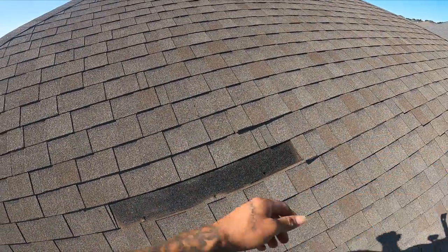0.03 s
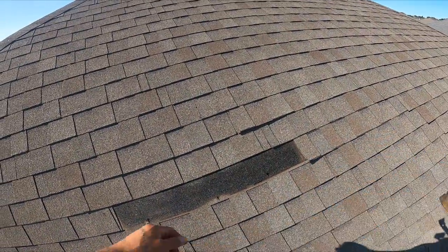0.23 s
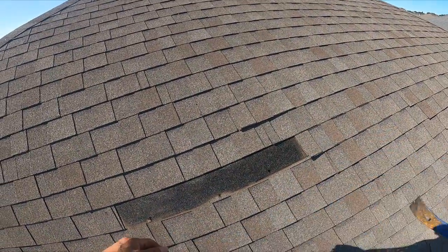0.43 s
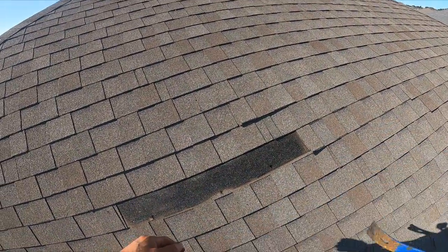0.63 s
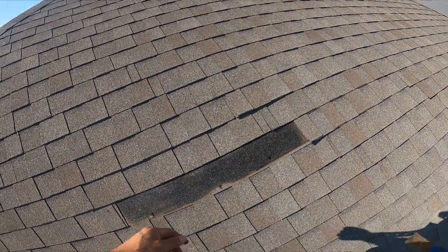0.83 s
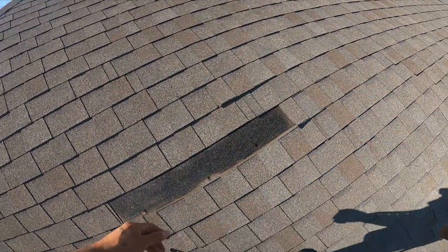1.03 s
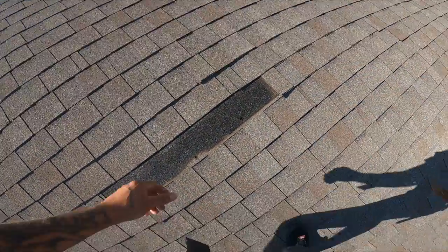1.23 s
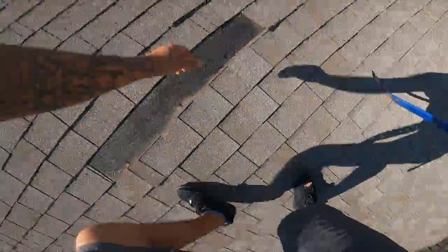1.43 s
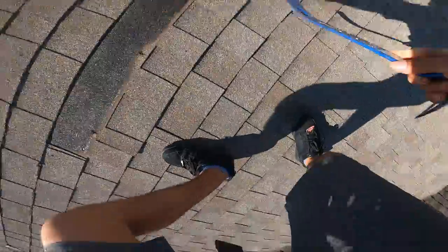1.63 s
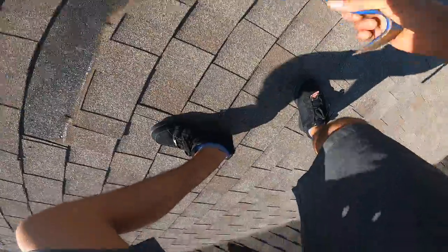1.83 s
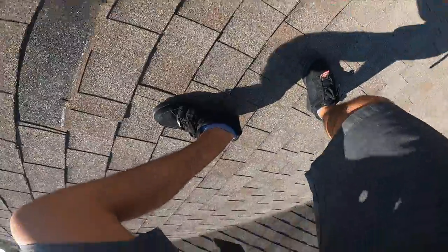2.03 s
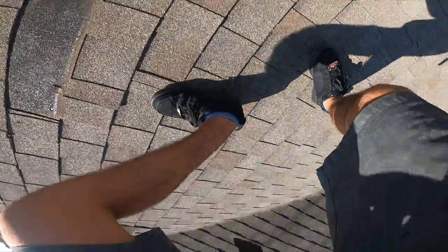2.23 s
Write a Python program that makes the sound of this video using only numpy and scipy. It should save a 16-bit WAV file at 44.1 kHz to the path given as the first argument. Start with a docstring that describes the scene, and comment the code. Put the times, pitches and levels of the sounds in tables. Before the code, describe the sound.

Gritty shoe scrapes on roof shingles, heard close up outdoors. After a few knocks and a brief steel clink, soles shift, snap loose grains and tap down, while light wind buffets the microphone and clothes rub faintly.

```python
"""Pry bar on a shingle roof

Someone shifts position on asphalt shingles, steel pry bar in hand. The bar clinks, hands and
shoes knock on the wooden deck, soles scrape over the mineral grit and loose grains snap.
Light wind buffets the two ports of a body-worn microphone and clothes rub against it."""
import sys
import numpy as np
from scipy import signal
from scipy.fft import rfft, irfft, next_fast_len
from scipy.io import wavfile

SR = 44100
rng = np.random.default_rng(int(sys.argv[2]) if len(sys.argv) > 2 else 0)


def unload_wav(signal):
    """Save mono or channel-first audio to the path in sys.argv[1] as 16-bit WAV at rate SR, clipped to [-1, 1]."""
    wavfile.write(
        sys.argv[1],
        SR,
        np.round(np.clip(np.atleast_2d(signal).T, -1, 1) * 32767).astype(np.int16),
    )


N = 101429


def undb(db):
    return 10 ** (np.asarray(db) / 20)


def unit(x):
    """Scale to rms 1."""
    return x / np.sqrt(np.mean(x ** 2))


def curve(table, column=1):
    """A column of a timed table, joined by straight lines."""
    table = np.array(table)
    return np.interp(np.arange(N) / SR, table[:, 0], table[:, column])


def colour(x, points, tilt_db=0):
    """EQ through (f/Hz, level/dB) points, tilted per octave above the third point; rms 1."""
    hz, db = np.array(points).T
    size = next_fast_len(x.shape[-1], True)
    octave = np.log2(np.maximum(np.fft.rfftfreq(size, 1 / SR), 1))
    gain = np.interp(octave, np.log2(hz), db) + tilt_db * np.maximum(octave, np.log2(hz[2]))
    return unit(irfft(rfft(x, size) * undb(gain), size)[..., :x.shape[-1]])


def band(x, lo_hz, hi_hz, order):
    """Causal band-pass."""
    return signal.sosfilt(signal.butter(order, [lo_hz, hi_hz], "band", fs=SR, output="sos"), x)


def add(out, start, x, pan_db=0):
    """Mix a sound in at a time; pan is left minus right."""
    i = max(int(start * SR), 0)
    x = (x * undb(np.array([[pan_db], [-pan_db]]) / 2))[:, :N - i]
    out[:, i:i + x.shape[1]] += x


def spread(mid, side, side_db=-2):
    """Stereo from a common mid and a weaker opposed side."""
    return mid + undb(side_db) * side * np.array([[1], [-1]])


# Fader ride of the clothes: t/s, rms level/dB
CLOTH_RIDE = [(0, -48.5), (.42, -50.5), (1.1, -57.5), (1.75, -58.5), (1.83, -44), (1.92, -56.5),
              (2.13, -56), (2.19, -48), (2.3, -56.5)]
# Muffled cloth EQ: f/Hz, level/dB
CLOTH_EQ = [(70, -10.5), (150, -2), (260, 0), (420, -12.5), (8000, -62)]


def clothes_and_air():
    """Clothes rub softly on the microphone over a bed of quiet outdoor air."""
    cloth = colour(rng.standard_normal(N), CLOTH_EQ) * undb(curve(CLOTH_RIDE))
    air_eq = [(500, -3), (1700, -10), (3000, -19), (10000, -31), (15000, -68)]
    air = spread(*colour(rng.standard_normal((2, N)), air_eq))
    return cloth + undb(-63.5) * air


# Fader ride of the rumble: t/s, left level/dB, right level/dB
WIND_RIDE = [(0, -39.5, -43), (.26, -44.5, -44.5), (.35, -27.5, -37), (.56, -27.5, -35), (.9, -31.5, -37),
             (1.07, -40, -38.5), (1.23, -37, -27.5), (1.55, -36.5, -44.5), (2.0, -41.5, -34.5),
             (2.15, -48, -48)]
# Rumble EQ: f/Hz, level/dB
RUMBLE_EQ = [(12, -11.5), (28, 5.5), (80, -2), (170, -17.5), (2000, -123.5)]
# Wind thumps on the ports: t/s, f/Hz, width/s, left level/dB, right level/dB
BUFFETS = [(.4035, 91, 0.0035, -15, -21), (0.5225, 143, 0.0025, -25, -33.5),
           (0.562, 101, 0.0048, -21, -32.5), (0.7805, 76.4, 0.012, -16.5, -36),
           (1.383, 113, 0.003, -27, -44), (1.94, 38, 0.014, -36, -32)]


def wind():
    """Each port rumbles on its own; single turbulent eddies swing the pressure once or twice."""
    t = np.arange(N) / SR
    ride = undb([curve(WIND_RIDE, column=1), curve(WIND_RIDE, column=2)])
    out = colour(rng.standard_normal((2, N)), RUMBLE_EQ) * ride
    eddy_eq = [(40, 3), (110, 19.5), (190, 8), (330, -6), (3000, -59)]
    turbulence = undb(-7) * colour(rng.standard_normal((2, N)), eddy_eq)
    for at, hz, width, left_db, right_db in BUFFETS:
        swell = 1 / np.cosh(np.clip((t - at) / width, -20, 20)) ** 2
        swing = np.sqrt(2) * np.sin(2 * np.pi * hz * (t - at))
        out += undb([[left_db], [right_db]]) * swell * (swing + turbulence)
    return out


# Where the weight rests: t/s, pan/dB
SHOE_PAN = [(1.25, 1), (1.6, -2), (1.87, -1), (2.05, 2.5)]


def shoe_pan(at):
    """Left-right balance of the shoes at a time."""
    return np.interp(at, *np.array(SHOE_PAN).T)


def granules(pitches_hz=(700, 2000, 4500, 10000), grains_per_s=3000, spread_db=6.5, decay_cycles=1.67):
    """Grit texture: dense tiny bursts of uneven size, coarse to fine, narrower in stereo at the low end."""
    mid = side = 0
    for hz in pitches_hz:
        hits = rng.random(N) < grains_per_s / SR
        sizes = undb(spread_db * np.minimum(rng.exponential(size=N), 4.5))
        decay = np.exp(-2 * hz / (decay_cycles * SR))
        bursts = np.sqrt(signal.lfilter([1 - decay], [1, -decay], (hits * sizes) ** 2))
        common, opposed = band(bursts * rng.standard_normal((2, N)), hz * 0.38, hz * 2.0, order=1)
        mid += common
        side += opposed * np.sqrt(hz / pitches_hz[-1])
    return spread(mid, side)


# Scrape cues: crest t/s, rise/s, fall/s, rms level at the crest/dB, treble tilt/(dB per octave)
SCRAPES = [(0.247, 0.011, 0.041, -49, -8), (.95, 0.067, 0.16, -60.5, -5),
           (1.115, 0.006, 0.056, -57.5, -3.5), (1.188, 0.016, 0.025, -52.5, -0.5),
           (1.29, 0.05, 0.07, -54, -1.5), (1.518, 0.097, 0.17, -57.5, -1), (1.584, 0.0045, 0.019, -37, 4),
           (1.624, 0.0027, 0.021, -45, 3.5), (1.673, 0.015, 0.074, -49.5, 0.5),
           (1.77, 0.0057, 0.0065, -48, 3.5), (1.828, 0.024, 0.023, -36, 2.5), (1.98, 0.11, 0.29, -55, 0),
           (2.111, 0.026, 0.018, -48, -1.5), (2.19, 0.015, 0.057, -67.5, 0)]
# EQ of rubbed grit: f/Hz, level/dB
SCRAPE_EQ = [(100, 7), (480, 8.5), (950, 1.5), (1400, 6.5), (2200, 2.5), (4300, 0), (6800, -6),
             (13500, -19.5), (16000, -42)]


def scrapes():
    """Soles and hands drag over the granules, swelling and dying away."""
    out, t, grit = np.zeros((2, N)), np.arange(N) / SR, granules()
    for crest, rise, fall, db, tilt_db in SCRAPES:
        pressure = np.exp(-(np.minimum(t - crest, 0) / rise) ** 2 / 2 - np.maximum(t - crest, 0) / fall)
        patch = colour(np.roll(grit, rng.integers(N), axis=1), SCRAPE_EQ, tilt_db)
        add(out, 0, undb(db) * pressure * patch, shoe_pan(crest))
    return out


# Modes of the hollow sole: f/Hz, level/dB, t60/s
SOLE_MODES = [(338, 5, 0.018), (1030, 0, 0.015), (1660, -2.5, 0.014), (2570, -1.5, 0.011),
              (3800, -2, 0.008)]
GRIT_TAIL_S = 0.0028


def shoe_tap(start=2.0333):
    """A sole taps down, crunches on the grit and rings hollow for a few milliseconds."""
    out, t = np.zeros((2, N)), np.arange(SR // 10) / SR
    ring = sum(undb(db) * np.sin(2 * np.pi * hz * t) * np.exp(-np.log(1000) * t / t60)
               for hz, db, t60 in SOLE_MODES)
    crunch = undb(-6.5) * colour(rng.standard_normal(len(t)), SCRAPE_EQ) * np.exp(-t / GRIT_TAIL_S)
    add(out, start, undb(-27.5) * (ring + crunch), shoe_pan(start))
    return out


# Snapping grains: t/s, peak level/dB, f/Hz
SNAPS = [(0.2671, -47, 5000), (0.5982, -44, 5200), (.9984, -40, 4300), (1.0943, -40, 4050),
         (1.1046, -39.5, 3300), (1.1226, -39, 3160), (1.2044, -37, 4400), (1.256, -33.5, 3800),
         (1.2833, -40, 5470), (1.5044, -34.5, 2830), (1.5813, -21.5, 4100), (1.5895, -18, 4750),
         (1.5964, -20, 5930), (1.6277, -11, 4510), (1.6427, -14.5, 4820), (1.6848, -22.5, 5290),
         (1.7946, -35.5, 3370), (1.813, -30.5, 5510), (1.8926, -29.5, 3470), (1.935, -28.5, 3000),
         (1.9726, -29, 4060), (2.0117, -29.5, 4020), (2.09, -34.5, 3600), (2.137, -38.5, 4100),
         (2.175, -37, 3500)]
# Bright EQ of cracking grit: f/Hz, level/dB
CRACK_EQ = [(1000, 5), (2700, 3), (4600, 7), (7000, 1), (12500, -10), (16000, -22)]
ATTACK_S = 0.00021


def grit_snaps(ring_s=0.00068, crack_s=0.00035):
    """A grain gives way: a few cycles of ring in two modes, a broad crack and a short scattered tail."""
    out, t = np.zeros((2, N)), np.arange(SR // 20) / SR
    for start, db, hz in SNAPS:
        mid, side, _ = colour(rng.standard_normal((3, len(t))), CRACK_EQ)
        phase = 2 * np.pi * hz * t
        modes = np.sin(phase) + undb(-13.5) * np.sin(1.857 * phase)
        # Weaker snaps ring shorter and crumble more into their tail.
        ring = modes * np.exp(-t / (ring_s * undb(db) ** 0.15))
        tail = undb(-28.5 - 0.22 * db) * np.exp(-t / GRIT_TAIL_S)
        crack = undb(-12) * np.exp(-t / crack_s)
        attack = 1 - np.exp(-(t / ATTACK_S) ** 2)
        snap = (ring + spread(mid, side) * (crack + tail)) * attack
        add(out, start, undb(db) * snap / abs(snap.mean(0)).max(), shoe_pan(start))
    return out


# Hand and shoe hits: t/s, peak level/dB, low cut f/Hz, high cut f/Hz, ring length factor
KNOCKS = [(0.2352, -22, 205, 287, 0.52), (0.2349, -38, 680, 1770, 1.2), (0.7484, -20.5, 483, 1590, 0.26),
          (0.7593, -33, 557, 720, 6.5), (.7705, -30.5, 530, 720, 3.53), (0.938, -35, 282, 720, 0.74),
          (0.958, -30.5, 253, 1200, 0.92), (0.984, -40, 390, 960, 1.46), (1.328, -39, 350, 2460, 0.21),
          (1.577, -23, 420, 1230, 3.4), (1.5884, -26.5, 385, 1190, 1.6), (1.5961, -23, 119, 564, 0.59),
          (1.603, -29.5, 380, 800, 0.33)]
# Modes of the wooden sheathing under the shingles: f/Hz, level/dB
DECK_MODES = [(135, 12), (260, 9), (330, 0), (432, 4), (588, 6), (640, 8), (890, 0.5), (1020, 6.5),
              (1338, 8.5), (1530, 12.5), (2620, 8.5)]


def deck_knocks(base_t60_s=0.056, lag_s=0.0006):
    """Each blow rings the damped deck, lows arriving last; the contact sets which modes speak."""
    out, t = np.zeros((2, N)), np.arange(SR // 5) / SR
    for start, db, lo_hz, hi_hz, length in KNOCKS:
        ring = 0
        for k, (hz, mode_db) in enumerate(DECK_MODES):
            ratio = hz / 500  # decay and lag scale from 500 Hz
            t60 = base_t60_s * length / ratio ** 0.94
            age = np.maximum(t - lag_s / np.sqrt(ratio), 0)
            contact = ((1 + (lo_hz / hz) ** 6) * (1 + (hz / hi_hz) ** 6)) ** -.5
            detune = 1 + 0.043 * rng.standard_normal()
            tone = (-1) ** k * np.sin(2 * np.pi * hz * detune * age)
            rattle = unit(band(rng.standard_normal(len(t)), hz * 0.63, hz * 1.384, order=2))
            envelope = (1 - np.exp(-(2 * hz * age) ** 2)) * np.exp(-np.log(1000) * age / t60)
            ring += undb(mode_db) * contact * (tone + undb(-7.5) * rattle) * envelope
        add(out, start - lag_s, undb(db) * ring / abs(ring).max())
    return out


# Clink cues: t/s, level/dB, brightness/(dB per octave), ring length factor, edgewise trim/dB, pan/dB
CLINKS = [(.001, -44, -1, 0.84, -2, 6.5), (0.7482, -26.5, -1, 0.87, -33, -5.5),
          (.7512, -46.5, 4.5, 0.84, -35.5, -6)]
# Modes of the steel bar: f/Hz, level/dB, t60/s, edgewise flag (rounded to 0 or 1)
BAR_MODES = [(1320, 5.5, 0.011, 0), (1794, -5, 0.16, 0), (2030, 6, 0.011, 0), (2614, -4, 0.29, 1),
             (2704, -5, 0.39, 1), (3540, -9.5, 0.12, 1), (3951, -11.5, 0.36, 1), (4060, 5, 0.007, 0),
             (4920, -15.5, 0.093, 0.11), (5890, 0, 0.011, 0.12), (7830, -25.5, 0.15, 0),
             (10340, -11, 0.26, 1)]


def pry_bar(chatter_s=0.013):
    """The hand-held steel clacks in its damped modes, rings in the others and chatters on the grit."""
    out, t = np.zeros((2, N)), np.arange(SR // 2) / SR
    for start, db, bright_db, length, edge_db, pan_db in CLINKS:
        ring = 0
        for k, (hz, mode_db, t60, edgewise) in enumerate(BAR_MODES):
            gain = undb(mode_db + round(edgewise) * edge_db + bright_db * np.log2(hz / BAR_MODES[0][0]))
            decay = np.exp(-np.log(1000) * t / (t60 * length))
            ring += (-1) ** k * gain * np.sin(2 * np.pi * hz * t) * decay
        grit = colour(rng.standard_normal((2, len(t))), CRACK_EQ, tilt_db=-3)
        chatter = undb(-12.5) * grit * np.exp(-t / chatter_s)
        attack = 1 - np.exp(-t / ATTACK_S)
        add(out, start, undb(db) * (ring + chatter) * attack, pan_db)
    return out


def scene():
    return deck_knocks() + shoe_tap() + grit_snaps() + scrapes() + pry_bar() + wind() + clothes_and_air()


def record(dry):
    """A steep high cut at 15.7 kHz on the whole mix."""
    return signal.sosfilt(signal.ellip(8, .2, 80, 15700, fs=SR, output="sos"), dry)


dry = scene()
out = record(dry)
unload_wav(out)
```